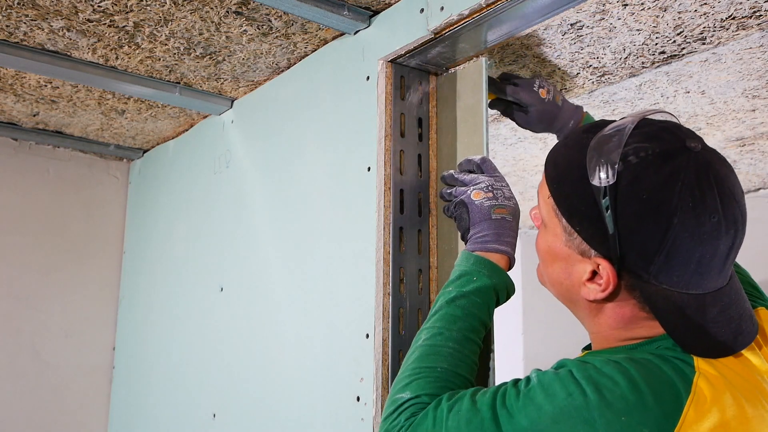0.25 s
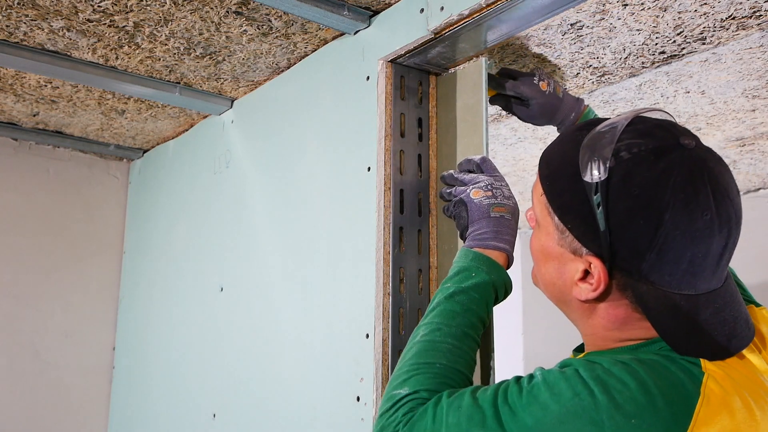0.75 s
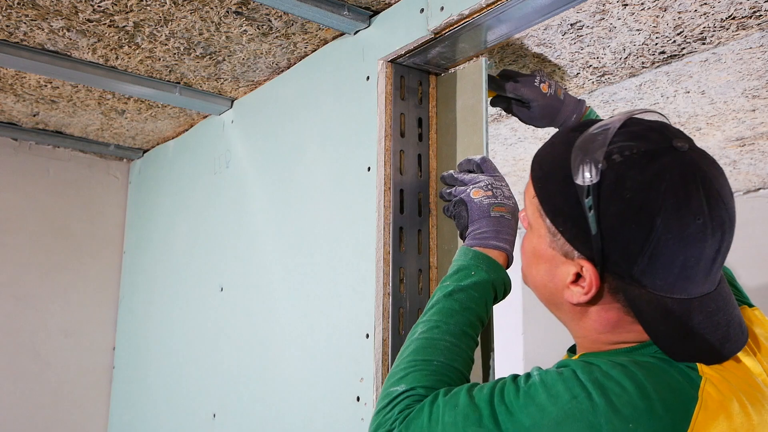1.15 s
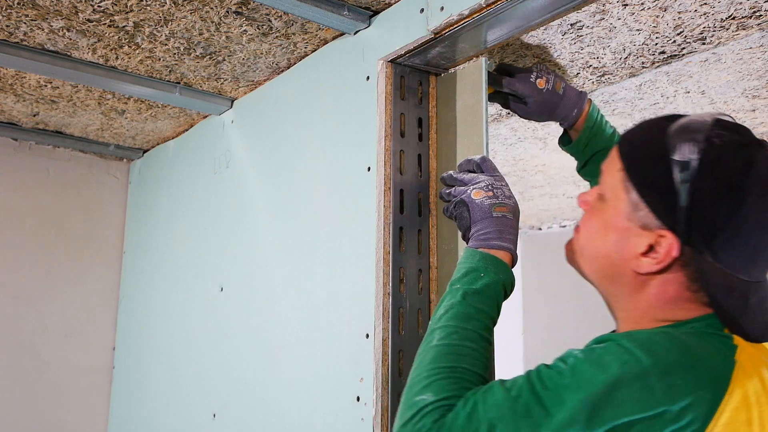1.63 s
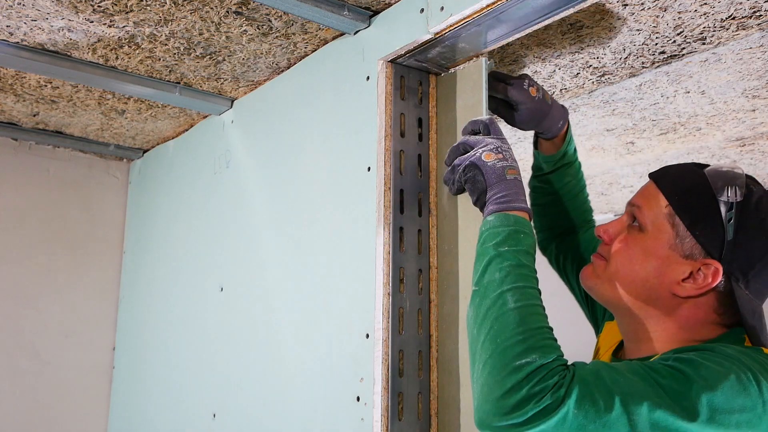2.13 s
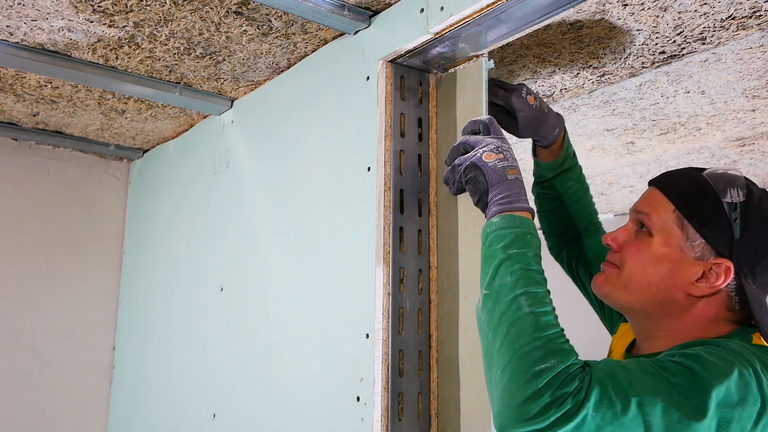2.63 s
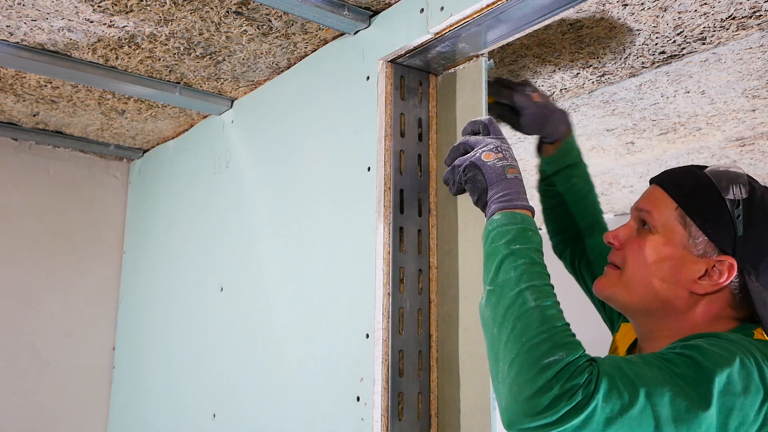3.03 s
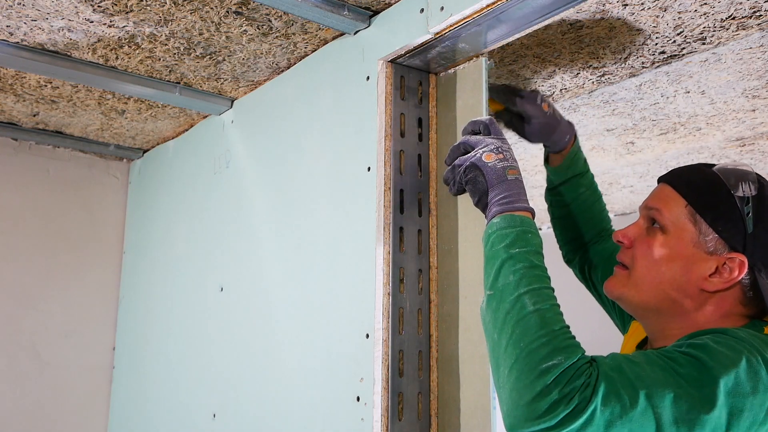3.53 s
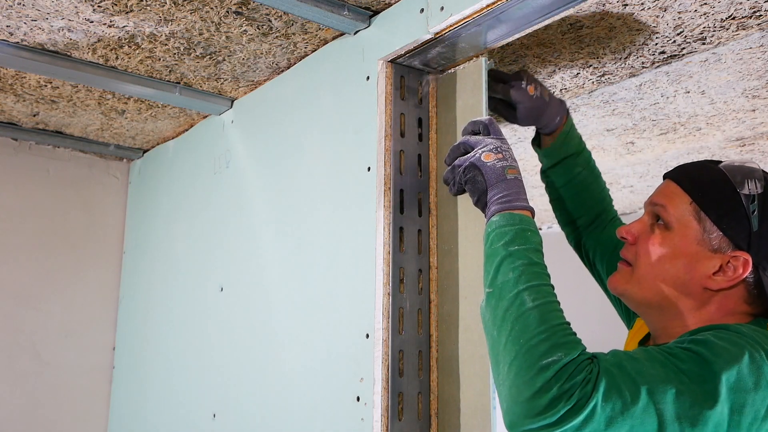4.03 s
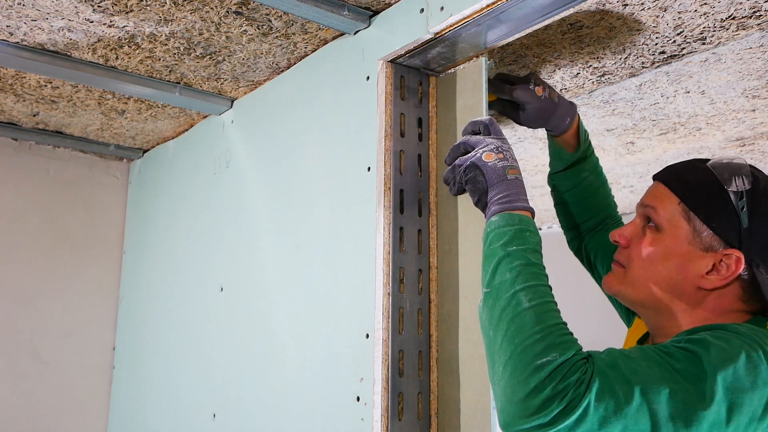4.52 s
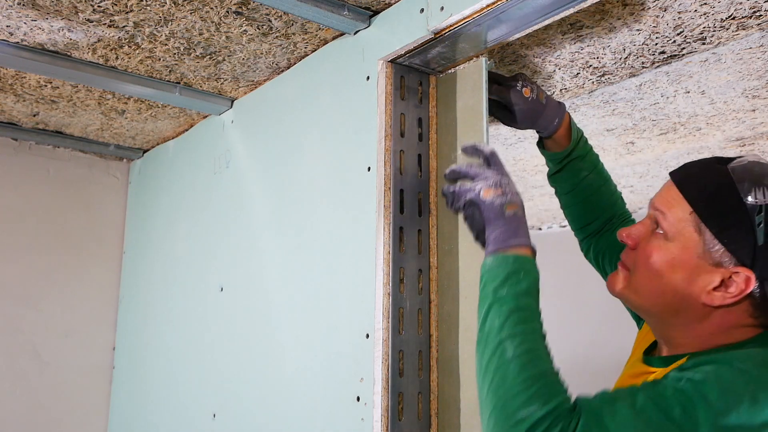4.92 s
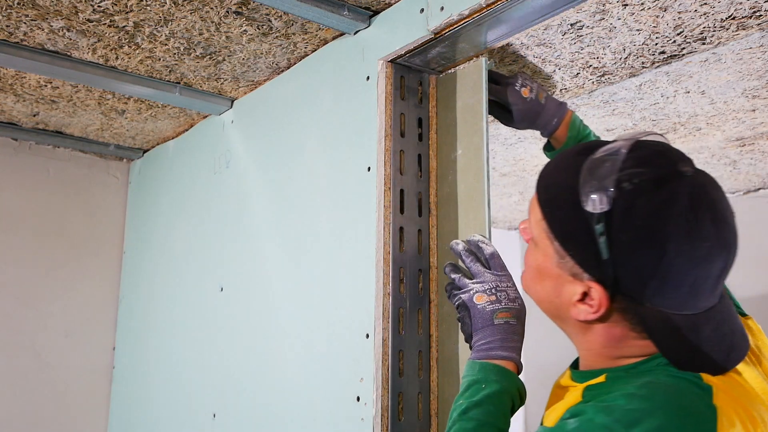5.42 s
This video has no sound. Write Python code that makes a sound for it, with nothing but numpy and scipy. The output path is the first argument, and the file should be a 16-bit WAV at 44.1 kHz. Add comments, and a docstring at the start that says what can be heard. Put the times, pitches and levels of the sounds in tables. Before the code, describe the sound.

A blade rasps irregularly through crumbly board up close, thudding the hollow wall and snagging with woody knocks, indoors.

```python
"""A hand saw works into the edge of a plasterboard wall in short, uneven strokes, one close microphone in a
bare room. Random crumb-sized fractures, paced by the teeth, shake modes of the hollow wall, the board and the
gripped blade. Now and then a tooth snags with a knock or skips with a steely ping; the bent wall rebounds after
each stroke. Between cuts a glove or sleeve brushes lightly over the board, or the blade scratches in its slot;
one soft low tone swells as it is shifted. The bare room answers every contact, over a faint, wavering rumble of
still air."""
import sys
import numpy as np
from scipy import signal
from scipy.fft import rfft, irfft
from scipy.io import wavfile

SR = 44100
rng = np.random.default_rng(int(sys.argv[2]) if len(sys.argv) > 2 else 0)


def wav_record(signal):
    """Record a signal, one row per channel, as 16-bit PCM in the file named by sys.argv[1]."""
    frames = np.transpose(np.atleast_2d(signal))
    bounded = np.clip(frames, -1, 1)
    # unit amplitude maps onto the largest positive 16-bit level
    quanta = np.round(bounded * 32767).astype(np.int16)
    wavfile.write(sys.argv[1], SR, quanta)


N = 250047
TIME = np.arange(N) / SR

# saw strokes, hard and light; boom is the wall against the force, brightness tilts rasp and grit:
# hardest_s, length_s, force_db, boom_db, brightness_db
STROKES = [ (.02, 0.094, -19.5, -0.5, 0.5), (.11, 0.11, -33, 4, -0.5), (.204, .115, -20, 7, -2),
           (.482, .04, -32.5, 10, -7.5), (0.524, 0.08, -29, 9, -2), (.615, .11, -50, 13.5, -5),
           (0.809, 0.0402, -42, 6, 4.5), (.87, 0.088, -38.5, 16, -1.5), (0.986, 0.044, -47, 15, -3),
           (1.142, .12, -72, -5, 13.5), (1.249, .11, -66.5, 7.5, 23), (1.335, .14, -57, 3, 8.5),
           (1.445, .14, -52, -6, 7.5), (1.536, 0.052, -27.5, -4.5, -6.5), (1.612, .13, -41, 12, 1),
           (1.74, .07, -46, 3, 13), (2.0, .03, -34.5, -3, 5), (2.11, .08, -52.5, 16, 15),
           (2.23, .1, -27, 11, 0.5), (2.426, 0.18, -26.5, 7, 7.5), (2.639, 0.14, -28.5, 6.5, 5),
           (2.762, 0.12, -40.5, 7, 4), (2.941, .12, -23.5, 9.5, 1.5), (3.104, 0.17, -25.5, -5, 3.5),
           (3.307, .04, -64, -4, 19.5), (3.447, .1, -49, -6, -0.5), (3.519, 0.04927, -41, 7, 8),
           (3.616, 0.063, -23.5, 5.5, -3), (4.026, .16, -24, 10.5, 3.5), (4.165, .07, -33, 2, 2),
           (4.298, 0.097, -27, 1, 4), (4.472, 0.16, -29.5, 9.5, 5.5), (4.797, 0.083, -24, 2.5, 1.5),
           (5.226, .13, -39.5, 10.5, -7), (5.386, 0.14, -37, 15, 1.5), (5.457, 0.1, -24, 1, 0.5),
           (5.62, 0.2, -37.5, 9, 0.5)]
# the bare room, one row each for wall, board, rasp and grit; level is against the direct sound:
# t60_s, level_db
ROOM = [(0.52, -0.5), (0.38, -4), (0.32, -3.5), (0.23, -7)]


def undb(db):
    """Decibels to gain."""
    return 10 ** (np.asarray(db) / 20)


def unit(x):
    """Scale to rms 1."""
    return x / np.sqrt(np.mean(x ** 2))


def blow(x):
    """Scale a short sound to the energy of 10 ms at rms 1."""
    return x * np.sqrt(SR / 100) / np.linalg.norm(x)


def convolve(x, response):
    """Pass a sound through an impulse response."""
    return signal.fftconvolve(x, response)[:len(x)]


def add(track, s, sound):
    """Mix a short sound into a track at time s."""
    i = int(s * SR)
    track[i:i + len(sound)] += sound[:len(track) - i]


def walk(rate):
    """Smooth chance with a spread near 1, heading for a new random value rate times a second."""
    knots = np.arange(0, N / SR + 1, 1 / rate)
    return 1.3 * np.interp(TIME, knots, rng.standard_normal(len(knots)))


def colour(points, size=32768):
    """Causal impulse response of a (Hz, dB) spectrum."""
    hz, db = np.transpose(points)
    freqs = np.maximum(np.arange(size // 2 + 1) * SR / size, 1)
    spectrum_db = np.interp(np.log(freqs), np.log(hz), db)
    # folding the cepstrum gives minimum phase: the energy comes as early as it can
    cepstrum = irfft(np.log(undb(spectrum_db)))
    cepstrum[1:size // 2] *= 2
    cepstrum[size // 2 + 1:] = 0
    return irfft(np.exp(rfft(cepstrum)))


def resonate(x, hz, t60):
    """One mode, gain 1 at its centre; a longer t60 makes it narrower."""
    width_hz = np.log(1000) / (np.pi * t60)
    return signal.lfilter(*signal.iirpeak(hz, hz / width_hz, fs=SR), x)


def register(x, index):
    """One of four adjoining frequency ranges: wall, board, rasp, grit."""
    # borders between the registers: crossover_hz
    crossovers = [170, 1500, 5500]
    edges = [None] + list(crossovers) + [None]
    for hz, kind in zip(edges[index:index + 2], ("highpass", "lowpass")):
        if hz:
            sos = signal.butter(2, hz, kind, fs=SR, output="sos")
            x = signal.sosfilt(np.vstack([sos, sos]), x)
    return x


def strokes(grain_db=1.5, tooth_hz=300, tooth_depth=0.55, patchy_db=1.0, flutter_db=2.5, light_db=-40,
            wall_lag_s=0.016):
    """Force on each register: hard strokes tear coarse crumbs, light ones only scratch."""
    power, speed = effort()
    # teeth pass unevenly, faster in mid-stroke; tooth_hz is a base that blade speed scales
    tooth_rate = tooth_hz * (.35 + speed) * undb(2.2 * walk(150))
    teeth = 1 + tooth_depth * np.cos(2 * np.pi * np.cumsum(tooth_rate) / SR)

    dust = rng.standard_normal(N)
    crumb_sizes = undb(grain_db * np.minimum(rng.exponential(size=N), 4))
    # on average one sample in ten carries a fracture, pushing either way
    breaks = rng.choice([-1, 1], N) * (rng.random(N) < .1)
    crumbs = unit(breaks * crumb_sizes * teeth * undb(patchy_db * walk(170)))

    # light_db: rasp level at which crumbs and dust share the power equally
    coarse = power[2] / (power[2] + undb(light_db) ** 2)
    fracture = np.sqrt(coarse) * crumbs + np.sqrt(1 - coarse) * dust
    # each patch of gypsum breaks with a colour of its own
    board, rasp, grit = (np.sqrt(p) * fracture * unit(undb(flutter_db * walk(110))) for p in power[1:])
    # the heavy wall feels only the overall drag and starts to swing late
    wall = dust * np.sqrt(np.interp(TIME - wall_lag_s, TIME, power[0]))

    board = edge_echo(board, echo=0.48, round_trip_s=0.004506)
    rasp = edge_echo(rasp, echo=0.12, round_trip_s=0.001913)
    grit = edge_echo(grit, echo=.4, round_trip_s=.0007)
    return wall, board, rasp, grit


def effort(bite_db=18, grip=5.9, rise_share=.53, slide_fade_s=0.049):
    """Power on each register and blade speed: strokes bite and ease off; slides and rest only scratch."""
    # the resting blade scratches faintly in its slot: wall_db, board_db, rasp_db, grit_db
    rest_levels = (-55, -60.5, -67.5, -75.5)
    # light slides between the cuts, one curve per slide: time_s, rasp_db, treble_db
    slide_curves = [
        [(1.78, -54.5, -59.5), (1.98, -44, -50.5), (2.134, -42, -50), (2.166, -49, -56), (2.23, -37.5, -52),
         (2.284, -58, -68), (2.33, -52, -48.5)],
        [(4.88, -45, -65), (4.91, -53, -56), (4.98, -48.5, -50), (5.108, -51, -53.5), (5.214, -42.5, -52),
         (5.24, -48.5, -54.5), (5.28, -53.5, -67)],
    ]
    # wall, board and rasp against a slide's rasp curve, grit against its treble curve:
    # wall_db, board_db, rasp_db, grit_db
    slide_levels = (0, -3, 2, 0.5)
    drag_db, rasp_base_db, grit_base_db = -1.5, -8.5, -18  # wall, rasp and grit against a stroke's force

    power = np.outer(undb(rest_levels), undb(2 * walk(2.01))) ** 2
    speed = np.zeros(N)
    for s, length, force_db, boom_db, bright_db in STROKES:
        start = s - rise_share * length  # rise_share of the stroke is spent biting in
        push = np.interp(TIME, [start, s, start + length], [0, 1, 0])
        pressure = undb(-bite_db * (1 - push) ** 1.68) * np.minimum(grip * push, 1)
        offsets_db = np.array([drag_db + boom_db, 0, rasp_base_db + bright_db, grit_base_db + bright_db])
        power += np.outer(undb(force_db + offsets_db), pressure) ** 2
        speed = np.maximum(speed, push)

    for slide in slide_curves:
        s, rasp_db, treble_db = np.transpose(slide)
        contact = np.interp(TIME, [s[0] - slide_fade_s, s[0], s[-1], s[-1] + slide_fade_s], [0, 1, 1, 0])
        for k, curve_db in enumerate((rasp_db, rasp_db, rasp_db, treble_db)):
            level_db = slide_levels[k] + np.interp(TIME, s, curve_db)
            power[k] += (contact * undb(level_db)) ** 2
    return power, speed


def edge_echo(x, echo, round_trip_s):
    """Waves return from the edge of blade or board; the path wanders about round_trip_s as the saw travels."""
    lag = round_trip_s * undb(2 * walk(3))
    return (x + echo * np.interp(TIME - lag, TIME, x)) / np.hypot(1, echo)


def responses():
    """How wall, board, rasp and grit answer one fracture, room included; each has unit energy."""
    # colour of a fracture heard through board and blade: frequency_hz, level_db
    cut_colour = [(22, 3.5), (42, -1.5), (85, 1.5), (150, 3.5), (200, -2.5), (420, -6), (640, -7.5),
                  (1200, -12), (2050, -16), (2800, -18), (3500, -19), (4200, -20), (5800, -26.5),
                  (9200, -29), (15500, -40.5)]
    # modes of the hollow wall, the board and the gripped blade; level is over the broad response:
    # frequency_hz, t60_s, level_db
    cut_modes = [(60.3, 0.99, 22), (85.52, 0.33, 6), (102.1, 0.25, 7), (135.7, 0.35, 7.5),
                 (269.05, 0.13, 8.5), (333.3, 0.082, 2), (536, 0.08, -3.5), (635, 0.07, -2),
                 (962, 0.87, -43), (1093, 0.34, -9), (2780, 0.011, -0.5), (3100, 0.0061, -2),
                 (3290, 0.011, 3.5)]

    broad = signal.sosfilt(signal.butter(2, 20, "highpass", fs=SR, output="sos"), colour(cut_colour))
    body = broad + sum(undb(db) * resonate(broad, hz, t60) for hz, t60, db in cut_modes)
    t = TIME[:len(body)]
    echoes = rng.standard_normal(len(t)) * (1 - np.exp(-t / 0.0013))  # the room builds up within ms

    answers = []
    for k, (t60, wet_db) in enumerate(ROOM):
        direct = register(body, index=k)
        wet = convolve(direct, echoes * np.exp(-np.log(1000) * t / t60))
        both = direct / np.linalg.norm(direct) + undb(wet_db) * wet / np.linalg.norm(wet)
        answers.append(both / np.linalg.norm(both))
    return answers


def rebound(wall_answer, late_s=0.02464, contact_s=0.0019, release_db=1):
    """As each stroke eases off, the bent wall springs back and booms."""
    out, t = np.zeros(N), TIME[:SR // 50]
    boom = blow(convolve(wall_answer, np.exp(-t / contact_s)))
    for s, _, force_db, boom_db, _ in STROKES:
        add(out, s + late_s, undb(force_db + boom_db + release_db) * boom)
    return out


def snags(answers, crumble_s=0.0049, ring_t60=0.014, ring_db=9, crack=1.4):
    """A caught tooth lets go: a jolt with a spray of crumbs, and the board rings at that spot."""
    # a tooth snags or breaks through; tilt is per register above the board:
    # time_s, ring_hz, force_db, tilt_db
    snag_events = [ (0.143, 627, -28, -5.5), (0.4679, 654, -32.5, -8.5), (0.8769, 302.6, -22, -17),
                   (1.532, 338, -34, -7), (1.616, 269.6, -24.5, -39), (2.243, 630, -23.5, -23),
                   (2.635, 636.6, -29, -3), (2.885, 900, -38, -5), (2.928, 890, -25, -7.5),
                   (3.064, 492, -25, -3.5), (3.5506, 1048, -9.5, -12.5), (3.5855, 965.6, -20, 1),
                   (3.995, 644, -25, -7), (4.315, 278, -11.5, -17), (4.332, 481.6, -16, -37),
                   (4.762, 610, -33.5, -3), (4.788, 328.5, -24, -5.5), (4.808, 261.5, -22.5, -5.5),
                   (5.43, 320, -30, -1), (5.585, 1069, -34.5, -6.5)]
    snag_wall_db, snag_grit_db = -2.5, -7  # against the force
    wall_give_db = -18  # the most that a short jolt moves the heavy wall

    out, t = np.zeros(N), TIME[:SR // 20]
    for s, ring_hz, force_db, tilt_db in snag_events:
        wall_db = min(force_db + snag_wall_db, wall_give_db)
        grit_db = force_db + 2 * tilt_db + snag_grit_db
        levels_db = wall_db, force_db, force_db + tilt_db, grit_db
        spray = rng.standard_normal(len(t)) * np.exp(-t / crumble_s)
        jolt = np.exp(-t / 0.00028)
        knock = crack * jolt + spray
        knock = knock + undb(ring_db) * resonate(knock, ring_hz, ring_t60)
        for force, answer, db in zip((jolt, knock, spray, spray), answers, levels_db):
            add(out, s, undb(db) * blow(convolve(answer, force)))
    return out


def skips(ping_hz=9050, ping_t60=0.003, scrape_db=-17, slip_s=0.0019, period_s=0.0084, room_db=-11):
    """Each skipping tooth scrapes for a moment and excites a high resonance of the blade."""
    # teeth skip and ping the steel, singly or in a chattering run: start_s, length_s, level_db
    skip_runs = [(.0097, .027, -27.5), (0.179, .004, -39.5), (4.139, .004, -53), (5.34, .004, -50.5),
                 (5.377, .004, -49), (5.39, .004, -49.5), (5.4301, .004, -40.5)]
    out, t = np.zeros(N), TIME[:SR // 50]
    for start, length, db in skip_runs:
        for s in np.arange(start, start + length, period_s):
            scrape = rng.standard_normal(len(t)) * np.exp(-t / slip_s)
            ping = resonate(scrape, ping_hz, ping_t60)
            add(out, s, undb(db) * blow(ping + undb(scrape_db) * scrape))
    grit_t60 = ROOM[-1][0]
    tail = rng.standard_normal(SR // 2) * np.exp(-np.log(1000) * TIME[:SR // 2] / grit_t60)
    return out + undb(room_db) * convolve(out, tail / np.linalg.norm(tail))


def low_tone(start_hz=168, end_hz=192, db=-30):
    """A short, soft low tone swells and rises a little, wavering in pitch, while the blade is shifted."""
    swell = np.interp(TIME, [1.935, 1.975, 2.01, 2.09], [0.022, 1, 0.47, 0.019])
    glide_hz = np.interp(TIME, [1.94, 2.04], [start_hz, end_hz])
    hz = glide_hz * (1 + 0.045 * walk(30.4))
    return undb(db) * swell * unit(np.sin(2 * np.pi * np.cumsum(hz) / SR))


def air(level_db=-45):
    """Faint room rumble: coloured noise with a slowly wavering level."""
    # relative spectrum of the still air of the room: frequency_hz, density_db (per Hz)
    air_colour = [(22, 12), (50, -21.5), (110, -16), (300, -23.5), (700, -38), (1600, -30), (3200, -57),
                  (6000, -43.5), (15500, -53)]
    rumble = unit(convolve(rng.standard_normal(N), colour(air_colour)))
    return undb(level_db + 0.6 * walk(0.57)) * rumble


def scene():
    """Saw, wall and room reach both channels alike."""
    answers = responses()
    sawing = sum(convolve(force, answer) for force, answer in zip(strokes(), answers))
    mono = sawing + rebound(answers[0]) + snags(answers) + skips() + low_tone() + air()
    return np.array([mono, mono])


def record(dry, top_hz=15900):
    """The recorder rounds the highest peaks and cuts the top."""
    rounded = np.tanh(0.78 * dry) / 0.64
    return signal.sosfilt(signal.ellip(10, .2, 80, top_hz, fs=SR, output="sos"), rounded)


dry = scene()
out = record(dry)
wav_record(out)
```